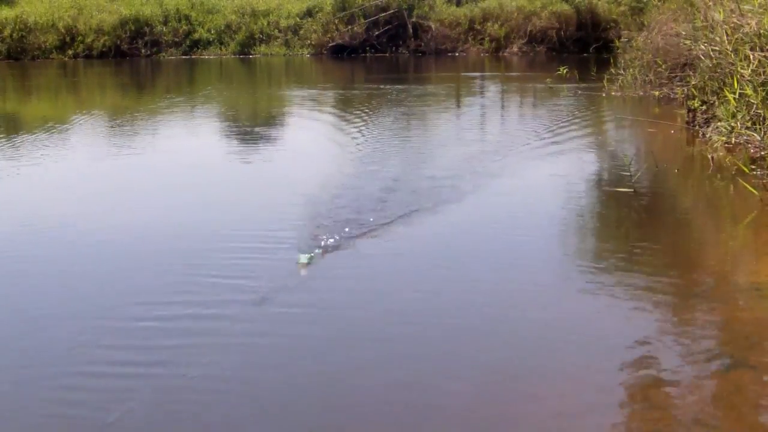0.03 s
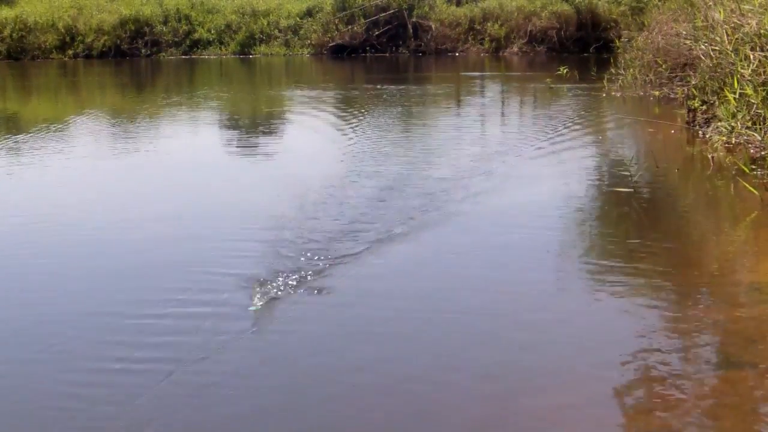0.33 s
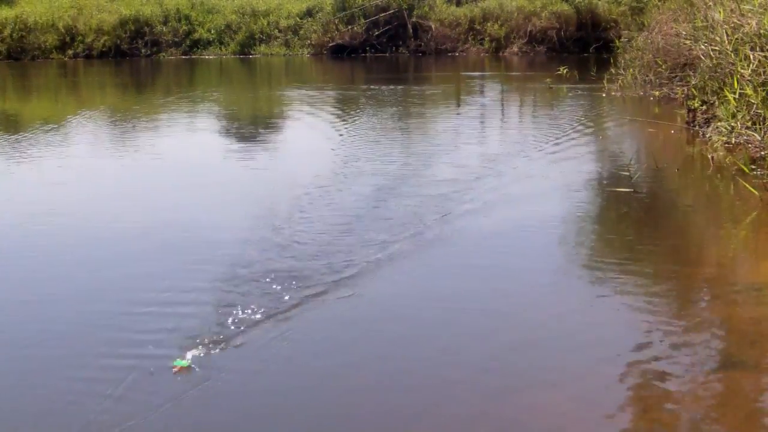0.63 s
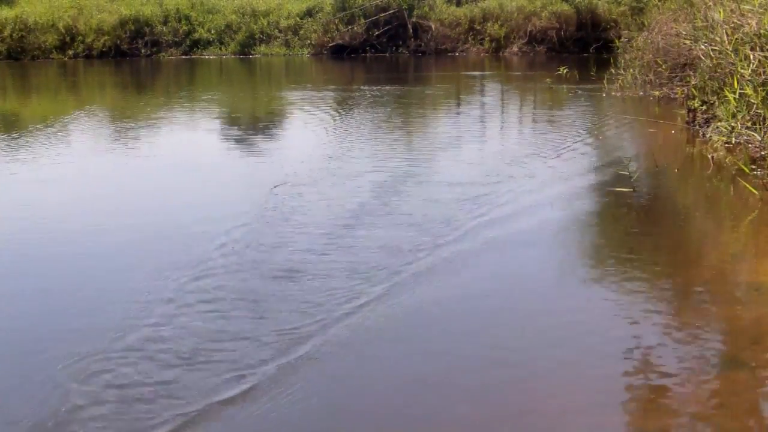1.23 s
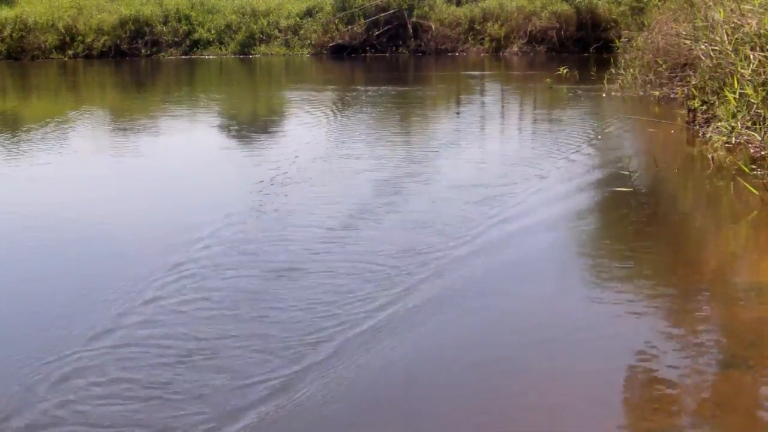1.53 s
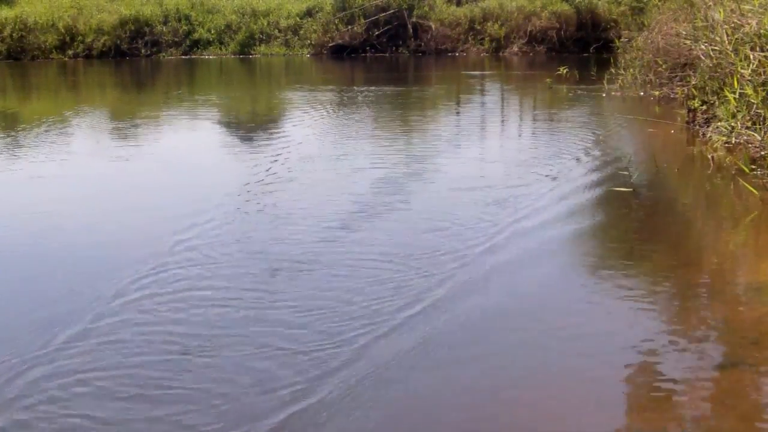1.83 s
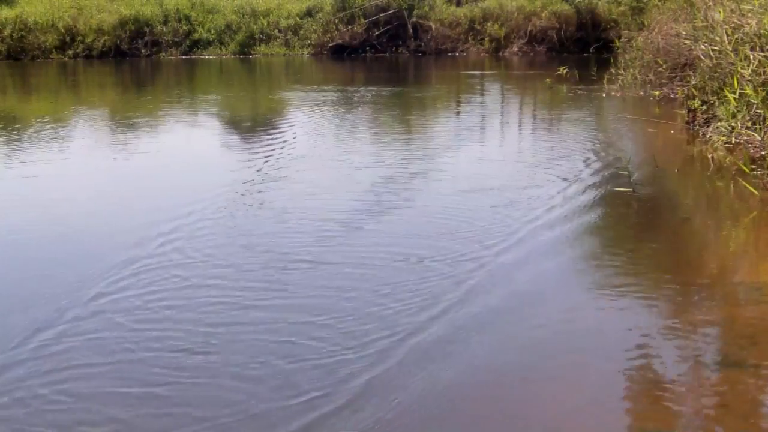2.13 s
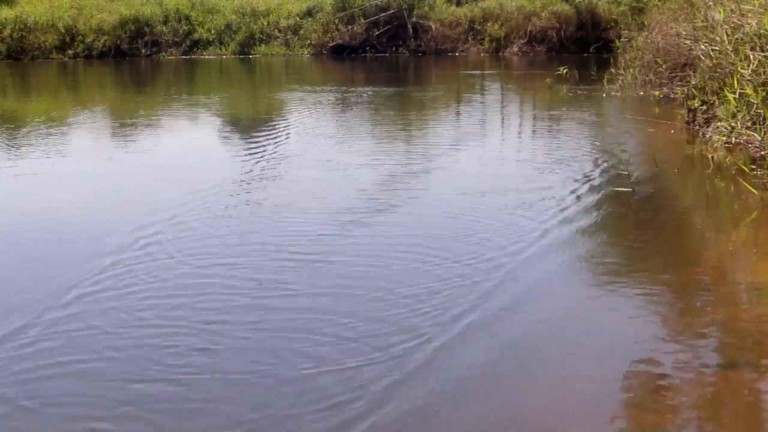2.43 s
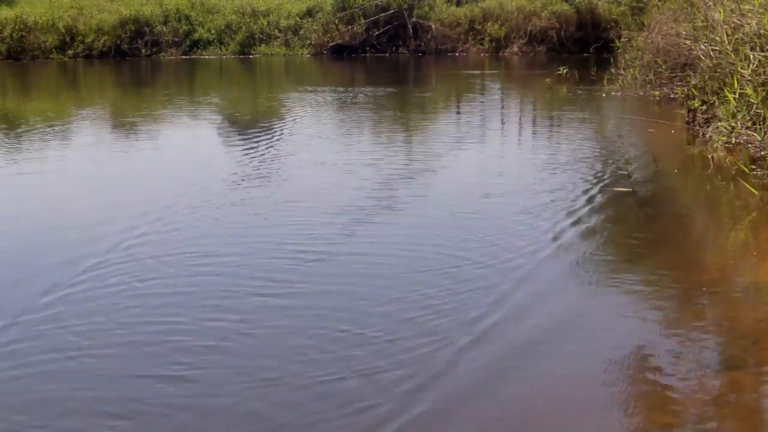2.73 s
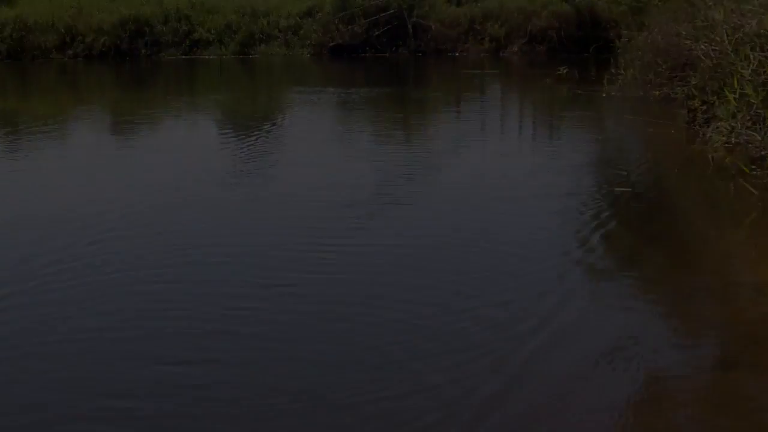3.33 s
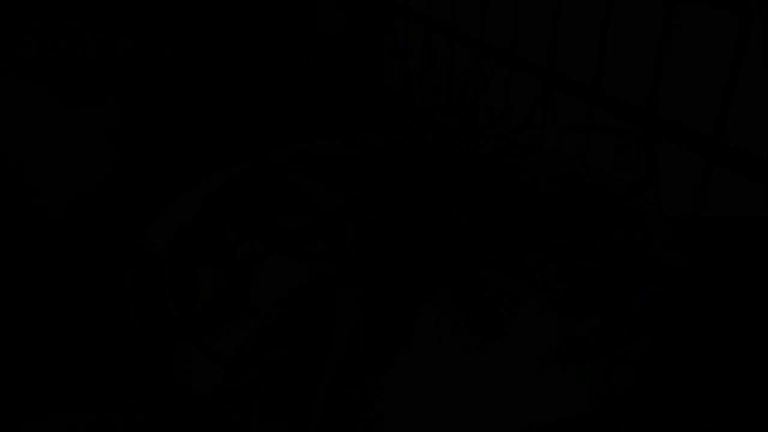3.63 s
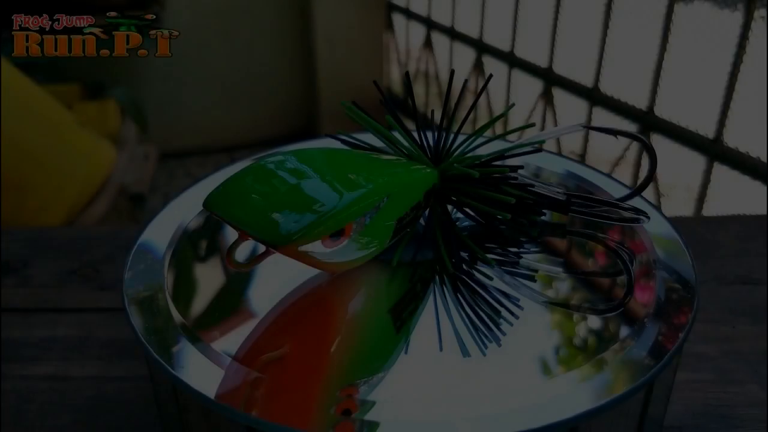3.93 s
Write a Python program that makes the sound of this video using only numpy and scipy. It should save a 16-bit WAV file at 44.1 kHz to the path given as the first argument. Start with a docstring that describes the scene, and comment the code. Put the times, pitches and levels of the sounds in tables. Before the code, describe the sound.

A fishing lure splashes lightly across a pond from the start, with sharp drips, small plops and a fizzing wake. The hardest splashes gurgle around 1.4 seconds, and the water settles by 2.7. High pulsing insects, a thin whine and a distant engine drone continue underneath, slowly fading from 2 seconds. A bird chirps faintly three times from about 3.5 seconds, and one dry tick comes near 4.

```python
"""A pond: a far engine drones, insects throb in the treble and a thin electrical whine lies over it all.
From the start a surface lure is reeled towards the bank: drops snap on the water, small bubbles ping,
air pockets plop, mostly upward in pitch, and the wake fizzes. The hardest splashes gurgle around 1.4 s.
From 2 s the scene slowly fades, and the wake settles by 2.7 s. Near the end a bird chirps three times,
and one dry tick comes last."""
import sys
import numpy as np
from scipy import signal
from scipy.fft import rfft, irfft
from scipy.io import wavfile

SR = 44100
rng = np.random.default_rng(int(sys.argv[2]) if len(sys.argv) > 2 else 0)


def inscribe(sig):
    """Save sig as 16-bit PCM at rate SR to the path in sys.argv[1].

    A 1-D sig is mono; a 2-D sig holds one channel per row.
    Samples are clipped to [-1, 1] before scaling.
    """
    pcm = np.round(np.clip(np.atleast_2d(sig).T, -1, 1) * 32767)
    wavfile.write(sys.argv[1], SR, pcm.astype(np.int16))


N = 176400
T = np.arange(N) / SR
BANK_T60_S = 0.044  # decay of the reflections from the bank
# how hard the lure stirs its wake: (time [s], level [dB])
WAKE = [(0, -4), (.2, -1), (.32, -4.5), (1.2, -3), (1.5, -1), (1.8, -6), (2.0, -9.5), (2.4, -2.5),
        (2.7, -25), (4, -33)]


def from_db(db):
    """Decibels to gain."""
    return 10 ** (np.asarray(db) / 20)


def rms_one(x):
    """Scale to unit rms."""
    return x / np.sqrt(np.mean(x ** 2) + 1e-20)


def level(curve):
    """A fader ride through (time [s], level [dB]) points."""
    return from_db(np.interp(T, *np.transpose(curve)))


def add(out, s, sound):
    """Mix a sound in at s seconds."""
    i = max(int(s * SR), 0)
    out[i:i + len(sound)] += sound[:max(N - i, 0)]


def noise(spectrum):
    """Unit-rms noise coloured by (frequency [Hz], level [dB]) points."""
    hz, db = np.transpose(spectrum)
    f = np.maximum(np.arange(N // 2 + 1) * SR / N, 1)
    colour = from_db(np.interp(np.log(f), np.log(hz), db))
    return rms_one(irfft(rfft(rng.standard_normal(N)) * colour, N))


def drift(hz):
    """Unit-rms random modulation, mostly slower than hz."""
    f = np.arange(N // 2 + 1) * SR / N
    return rms_one(irfft(rfft(rng.standard_normal(N)) / (1 + (f / hz) ** 2), N))


def butter(x, hz, kind, order=2):
    """Causal Butterworth filter."""
    sos = signal.butter(order, np.minimum(hz, SR / 2 - 1), kind, fs=SR, output="sos")
    return signal.sosfilt(sos, x + 1e-18)


def reflections(length, t60, gap_s):
    """A dying noise tail of unit energy, length samples long, that opens after a gap."""
    t = T[:length]
    tail = rng.standard_normal(length) * from_db(-60 * t / t60) * (t > gap_s)
    return tail / np.linalg.norm(tail)


def echo(x):
    """Diffuse, dying reflections from the water and the reeds on the bank."""
    return signal.fftconvolve(x, reflections(SR // 2, BANK_T60_S, gap_s=.001))[:N]


def scatter(sound):
    """Each drop lands elsewhere, so ripples reflect it in a pattern of its own."""
    ripples = from_db(-7) * reflections(SR // 20, t60=0.014, gap_s=.0007)
    return signal.fftconvolve(sound, signal.unit_impulse(len(ripples)) + ripples)


def air():
    """A bed of open-air rumble."""
    # colour of the air: (frequency [Hz], level [dB])
    colour = [(20, -7), (60, -2), (105, -10.5), (200, -13.5), (340, -20), (450, -21.5), (650, -25),
              (1250, -28.5), (3000, -39.5), (7000, -42)]
    rumble = butter(noise(colour), 28, "high")
    return from_db(-26.5) * butter(rumble, 7400, "low", order=6)


def engine():
    """A far engine: low partials, each wavering in level and pitch."""
    # engine partials: (frequency [Hz], level [dB])
    partials = [(29.9, -28.5), (54.15, -29), (77.5, -28.5), (86.75, -25), (139.7, -37), (154.6, -40.5),
                (185.8, -44.5), (233, -40.5), (264.8, -47), (281.9, -43.5), (451, -50.5)]
    wander_hz = 1.634
    out = np.zeros(N)
    for hz, db in partials:
        waver = 1 + 0.24 * drift(1.9)
        cycles = np.cumsum(hz + wander_hz * drift(6.63)) / SR + rng.random()
        out += from_db(db) * np.sqrt(2) * waver * np.sin(2 * np.pi * cycles)
    return out


def whine():
    """A thin, high electrical whine with faint side tones and hiss; a ripple as from audio coding."""
    # the whine and its side tones: (offset below the whine [mains steps], level [dB])
    lines = [(0, -43.5), (1, -52), (2, -58), (65, -57)]
    whine_hz, mains_hz, coder_ripple_hz = 15734, 60, 12
    partials = [(whine_hz - mains_hz * steps, db) for steps, db in lines] + [(whine_hz / 2, -59)]
    coder_ripple = 1 + .4 * np.sin(2 * np.pi * coder_ripple_hz * T + drift(1.8))
    tone = sum(from_db(db) * np.sin(2 * np.pi * (hz * T + rng.random())) for hz, db in partials)
    hiss = from_db(-40.5) * rng.standard_normal(N)
    return np.sqrt(2) * coder_ripple * tone + hiss


def insects():
    """A grainy high rasp with three ringing bands, throbbing in even beats."""
    # colour of the broad rasp: (frequency [Hz], level [dB])
    colour = [(7300, -37), (8100, -37), (8400, -9), (8900, -2.5), (9350, -2.5), (10100, 1), (10800, -2),
              (11600, -6.5), (12100, -20), (14000, -45)]
    # narrow resonances: (centre [Hz], width [Hz], level against the broad rasp [dB])
    resonances = [(8930, 68, -13.5), (9620, 91, -13), (10870, 130, -9)]
    throb_hz, first_peak_s, depth_db = 7.5, .128, 5.8
    rings = np.zeros(N)
    for hz, width, db in resonances:
        band = [hz - width / 2, hz + width / 2]
        rings += from_db(db) * rms_one(butter(rng.standard_normal(N), band, "band", order=1))
    beat = np.tanh(4 * (np.cos(2 * np.pi * throb_hz * (T - first_peak_s)) + .4))  # rounded square wave
    ease_db = 0.43 * np.maximum(T - 0.98, 0)  # the insects ease off and their beat gets shallower
    throb_db = (depth_db - ease_db) * (beat - 1) / 2
    gain = from_db(-32 - ease_db + throb_db + .5 * drift(15))
    rasp = noise(colour) + rings
    grain = 1 + 0.12 * drift(590)
    return gain * rasp * grain


def bird():
    """Thin, slightly rough whistles that arch in pitch, with a weaker second voice below."""
    # chirps: (time [s], length [s], level [dB], first [Hz], top [Hz], last [Hz], place of the top [0-1])
    chirps = [(3.481, 0.125, -36, 4340, 6000, 4140, 0.74), (3.737, 0.078, -35.5, 4500, 5700, 5700, 0.38),
              (3.791, .09, -36, 3980, 4870, 4100, 0.4)]
    out = np.zeros(N)
    for s, length, db, first_hz, top_hz, last_hz, top in chirps:
        u = T[:int(length * SR)] / length
        from_top = np.abs(u - top) / np.where(u < top, top, 1 - top)
        hz = top_hz + (np.where(u < top, first_hz, last_hz) - top_hz) * from_top ** 1.1
        jitter = 1 + 0.0094 * drift(300)[:len(u)]
        phase = 2 * np.pi * np.cumsum(hz * jitter) / SR
        voices = np.sin(phase) + from_db(-9) * np.sin(.68 * phase)
        add(out, s, from_db(db) * np.sin(np.pi * u) * voices)
    out *= 1 + 0.31 * drift(120)  # roughness
    return out + from_db(-3.5) * echo(out)


def tick(s=3.9707):
    """One dry, broad tick with a short, bright crack."""
    crack_t60_s = 0.018
    t = T[:SR // 20]
    bright = butter(rng.standard_normal(len(t)), 6000, "high", order=1)
    out = np.zeros(N)
    add(out, s, from_db(-7) * scatter(snap(1830, octaves=1.2)))
    add(out, s, bright * from_db(-6 - 60 * t / crack_t60_s))
    return out


def singing_bubbles(per_s=36, mean_length_s=0.043, max_glide=0.046):
    """Faint bubbles that ring on in the wake, each sliding a little up or down."""
    out = np.zeros(N)
    for when, pitch, size, glide in rng.random((int(per_s * N / SR), 4)):
        hz = 1800 * 3.2 ** pitch
        note = plop(mean_length_s * (.5 + size), hz, hz * (1 + max_glide * (2 * glide - 1)))
        add(out, when * N / SR, size * note * np.hanning(len(note)))
    return from_db(-32) * out


def wash():
    """The wake's soft hiss and ringing, riding on the stir of the lure."""
    # colour of the wake's hiss: (frequency [Hz], level [dB])
    colour = [(500, -29), (1200, 0.5), (2200, -1), (3300, -5), (5000, -2), (6600, 3.5), (7900, -13),
              (15000, -9)]
    return level(WAKE) * (from_db(-40) * noise(colour) + singing_bubbles())


def swishes():
    """Two soft, grainy swishes of spray and line."""
    # swells: (peak time [s], half-width [s], level [dB])
    swells = [(2.167, 0.053, -31), (2.43, 0.025, -31.5)]
    # colour of a swish: (frequency [Hz], level [dB])
    colour = [(600, -16), (1400, 5), (3500, -4.5), (7000, -12.5), (15000, -24)]
    envelope = sum(from_db(db) * np.exp(-2 * ((T - s) / width) ** 2) for s, width, db in swells)
    return envelope * noise(colour) * from_db(2.8 * drift(150))


def snap(hz, octaves=1.39):
    """An impact: one broad, dead pulse of height 1."""
    half_band = 2 ** (octaves / 2)
    band = [hz / half_band, hz * half_band]
    pulse = butter(signal.unit_impulse(1024), band, "band")
    pulse = butter(pulse, band, "band", order=1)
    return pulse / np.abs(pulse).max()


def ping(hz, t60, rise_per_s=11.5):
    """A small bubble: a dying sine that rises a little."""
    t = T[:SR // 20]
    return np.sin(2 * np.pi * hz * (t + rise_per_s * t * t / 2)) * from_db(-60 * t / t60)


def plop(length, first_hz, last_hz, attack_s=0.0005, sag_db=4.5):
    """A closing air pocket: the pitch bends ever faster, the level sags a little, then cuts off."""
    t = T[:int(length * SR)]
    u = t / length
    hz = first_hz * (last_hz / first_hz) ** (u ** 1.8)
    attack = 1 - np.exp(-t / attack_s)
    release = (1 - u ** 12) ** 2
    return attack * release * from_db(-sag_db * u) * np.sin(2 * np.pi * np.cumsum(hz) / SR)


def fizz(per_s=550, mean_t60_cycles=22, spread_db=10):
    """Tiny bubbles bursting at random in the wake, each ringing for a few milliseconds."""
    out = np.zeros(N)
    for when, pitch, size, ring in rng.random((int(per_s * N / SR), 4)):
        hz = 1900 + 5500 * pitch
        t60 = mean_t60_cycles * (.5 + ring) / hz
        add(out, when * N / SR, from_db(spread_db * size ** 4) * ping(hz, t60))
    return from_db(-31.5) * out * level(WAKE) ** 1.83


def gurgles():
    """Air dragged under by the lure: gliding notes broken up by the churning water."""
    # gurgles at the hardest splashes: (time [s], length [s], level [dB], first [Hz], last [Hz])
    notes = [(1.206, 0.048, -32.5, 2500, 2070), (1.388, 0.036, -27.5, 2410, 2900),
             (1.41, 0.0317, -22, 1944, 1670), (1.559, 0.01, -18.5, 1480, 1380)]
    out = np.zeros(N)
    for s, length, db, first_hz, last_hz in notes:
        add(out, s, from_db(db) * plop(length, first_hz, last_hz))
    return out * drift(110)


def droplets(s, hit_db, count=3):
    """A hit throws up droplets that fall back within moments and ping; hard hits saturate."""
    out = np.zeros(N)
    for delay, pitch, size in rng.random((count, 3)):
        gain = from_db(min(hit_db, -10) - 11) * (.5 + size)
        add(out, s + .0025 + .01 * delay, gain * ping(3400 * 2 ** pitch, t60=.006))
    return out


def lure():
    """Snaps, pings, plops, gurgles and fizz with a faint tail from the bank; hits throw fine spray."""
    # drops and splashes hitting the surface: (time [s], level [dB], centre [Hz])
    snaps = [(0.029, -11, 3040), (0.1283, -13, 2580), (0.44, -16.5, 4800), (0.6652, -16, 2900),
             (0.7277, -1.5, 3330), (1.0728, -6.5, 4070), (1.2482, 0.5, 3430), (1.4268, 4, 4000),
             (1.5276, -14, 3900), (1.564, -10.5, 3740), (1.612, -3.5, 3920), (1.611, -15, 670),
             (1.6313, -12, 1800), (1.6926, -5, 4900), (1.733, -16.5, 4500), (1.781, -17, 3800),
             (1.836, -14, 5230), (2.016, -20, 5000), (2.431, -16, 3880), (2.6392, -18.5, 1240)]
    # small bubbles ringing, and the short ring after the two hardest hits (at 1.2486 s and 1.4269 s): (time
    # [s], level [dB], pitch [Hz], ring t60 [ms])
    pings = [(0.157, -13.5, 4940, 7.1), (0.2247, -15, 6200, 8.7), (0.3684, -16.5, 2150, 16),
             (0.5664, -16, 3500, 6.5), (0.606, -8, 6320, 6.2), (0.8333, -20.5, 2330, 11),
             (0.905, -11.5, 4900, 5.8), (1.1214, -15, 6700, 6.0), (1.1526, -21.5, 2330, 12),
             (1.2486, -3, 3170, 8.8), (1.2958, -5.5, 5030, 8.7), (1.312, -18, 4900, 9),
             (1.4269, 1.5, 3550, 8.3), (1.444, -14, 6070, 8.1), (1.512, -8.5, 4630, 8.2),
             (1.5174, -12, 5460, 4.6), (1.586, -19, 3900, 8), (1.629, -9.5, 6700, 7.1),
             (1.6633, -15.5, 4630, 8.2), (1.701, -10.5, 5250, 7.4), (1.7899, -13, 6500, 5.4),
             (1.854, -20, 3660, 21), (2.077, -18, 2600, 9.2), (3.46, -21, 1730, 13)]
    # air pockets that glide as they close: (time [s], length [s], level [dB], first [Hz], last [Hz])
    plops = [(0.163, 0.024, -28, 562, 1240), (0.195, 0.0045, -14, 3100, 4650),
             (0.388, 0.029, -29.5, 810, 1110), (0.406, 0.037, -27, 512, 1430),
             (.548, 0.0083, -20, 2070, 1930), (.9355, 0.0092, -12, 1980, 3430),
             (0.958, 0.0037, -18, 3860, 6450), (1.632, .078, -16.5, 417, 1300),
             (1.684, 0.0097, -20.5, 1320, 1580)]
    water = fizz() + gurgles()
    for s, db, hz in snaps:
        add(water, s, from_db(db) * scatter(snap(hz)))
        water += droplets(s, db)
    for s, db, hz, ring_ms in pings:
        add(water, s, from_db(db) * scatter(ping(hz, ring_ms / 1000)))
        add(water, s, from_db(db - 1) * snap(hz))  # click on the bubble's attack
        water += droplets(s, db) * level(WAKE)
    spray = butter(np.abs(water) * rng.standard_normal(N), 8600, "high", order=6)
    for s, length, db, first_hz, last_hz in plops:
        add(water, s, from_db(db) * plop(length, first_hz, last_hz))
    water += from_db(-14.5) * echo(water)
    return butter(water, 8200, "low", order=10) + from_db(-16) * spray


def scene():
    """Everything at the pond in mono, under one fade."""
    # master fade: (time [s], level [dB])
    fade = [(0, -0.5), (2.0, -0.5), (2.6, -1), (3.0, -3), (3.5, -5.5), (4, -9.5)]
    mix = lure() + wash() + swishes() + tick() + bird() + insects() + engine() + air() + whine()
    return (mix * level(fade))[None]


def record(dry):
    """Peaks clip at full scale and the top is cut steeply."""
    cutoff_hz = 15850
    high_cut = signal.ellip(12, .1, 80, cutoff_hz, fs=SR, output="sos")
    return signal.sosfilt(high_cut, np.clip(dry, -1, 1))


dry = scene()
out = record(dry)
inscribe(out)
```